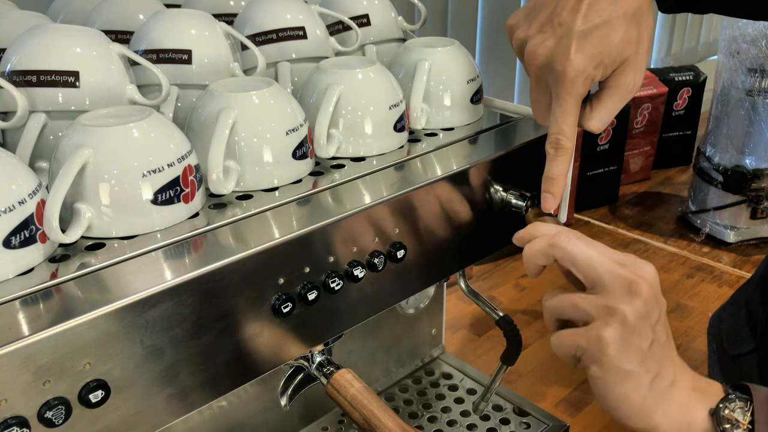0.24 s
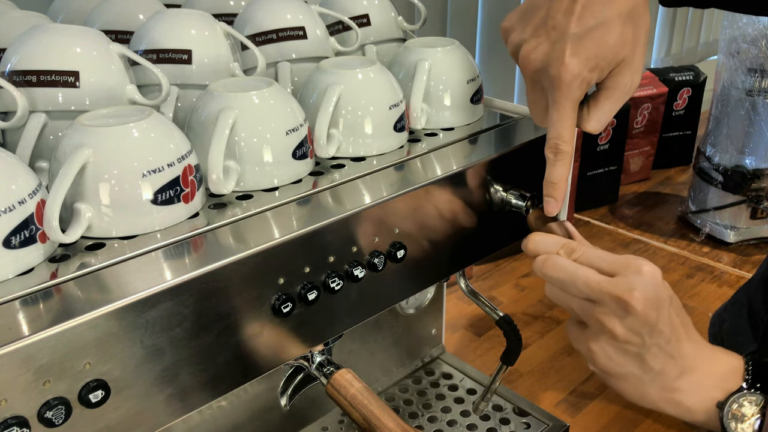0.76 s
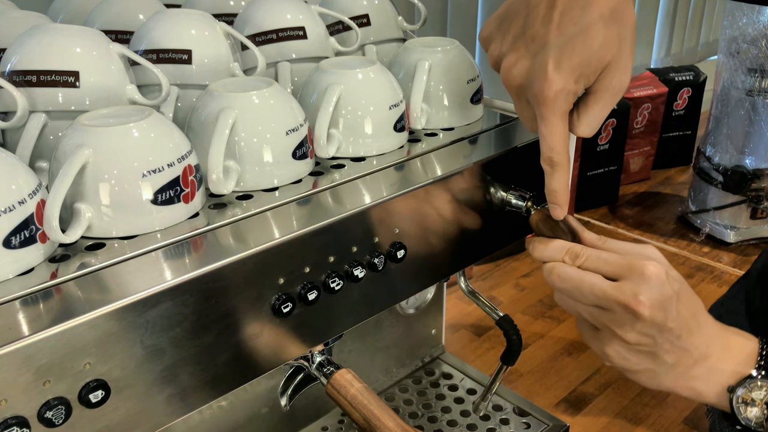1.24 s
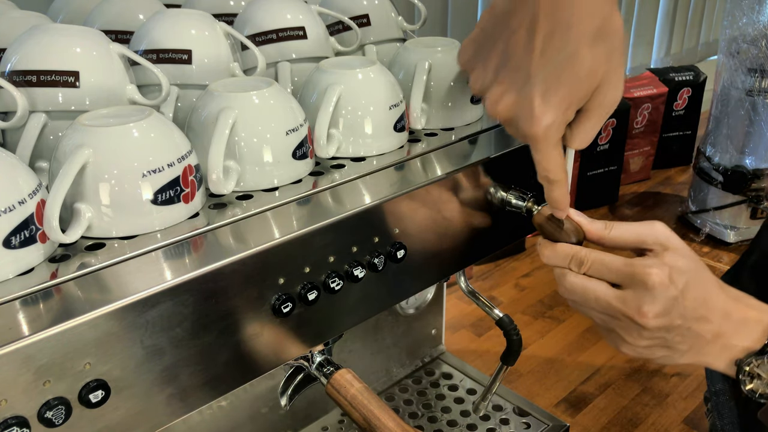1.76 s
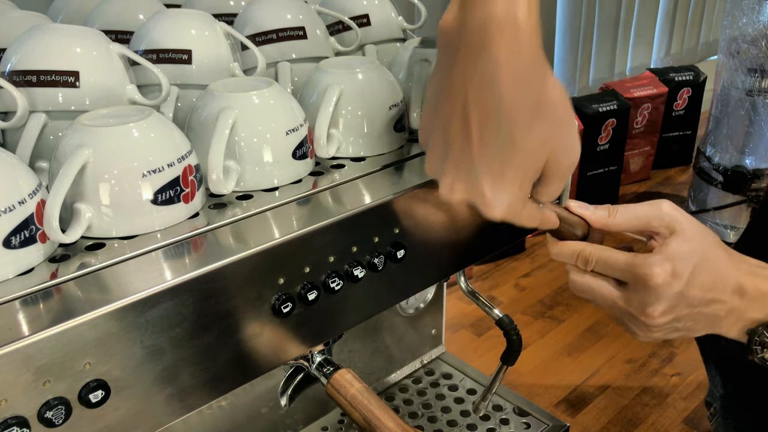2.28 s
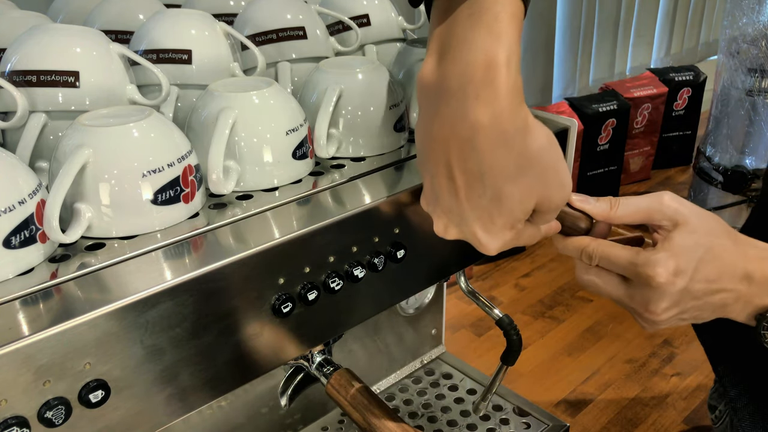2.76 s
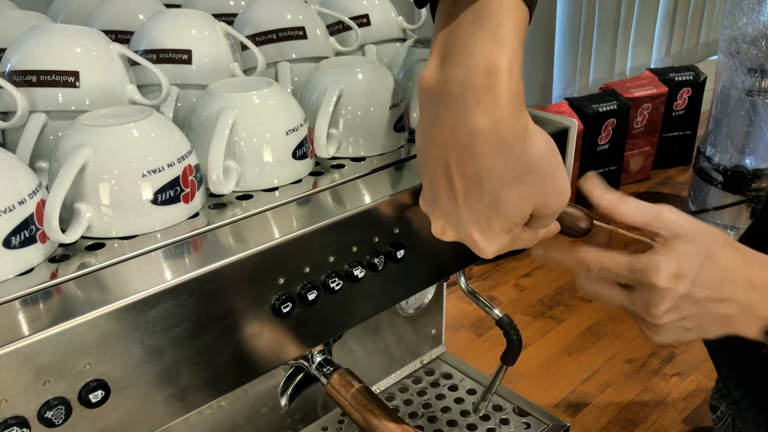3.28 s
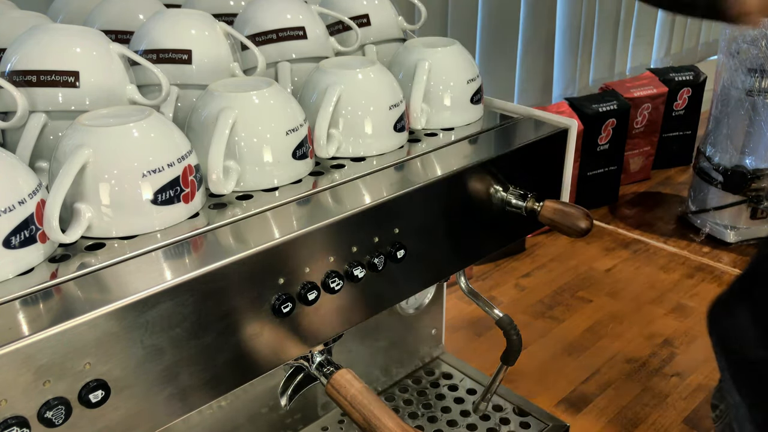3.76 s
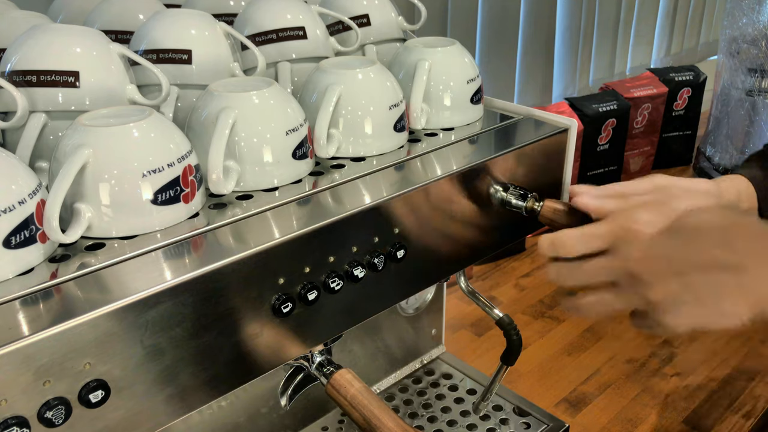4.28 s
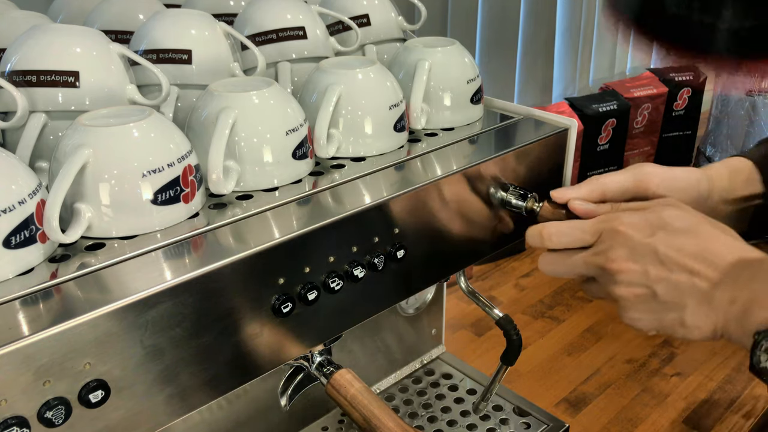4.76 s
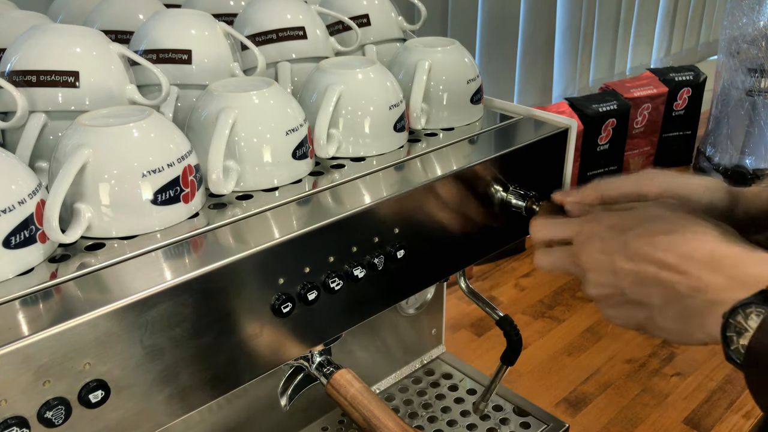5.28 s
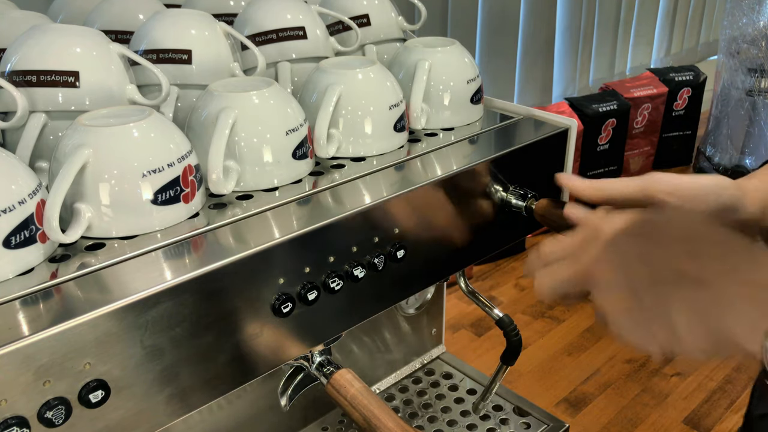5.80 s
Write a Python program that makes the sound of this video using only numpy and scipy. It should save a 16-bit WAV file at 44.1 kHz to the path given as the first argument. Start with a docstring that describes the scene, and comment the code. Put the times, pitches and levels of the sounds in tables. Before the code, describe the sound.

A loud, steady blast of steam hisses from an espresso machine wand, stutters and cuts off abruptly, leaving faint room tone and ticks.

```python
"""A steam wand blows into the air of a small room: noise in narrow bands for the hiss, low noise for the rumble.
Its colour shifts with flow, aim, nearby hands and the microphone's tilt; resonances add breathy whistles.
The lever is flicked nearly shut and part-way open again, then closed; each move sends a slow pressure swing.
Afterwards a noise-built room tail dies away, leaving room tone, a faint motor buzz and a few dry ticks."""
import sys
import numpy as np
from scipy import signal
from scipy.fft import rfft, irfft
from scipy.io import wavfile
from scipy.ndimage import uniform_filter1d

SR = 44100
rng = np.random.default_rng(int(sys.argv[2]) if len(sys.argv) > 2 else 0)


def volts_from_decibels(level):
    """Turn decibel levels (scalar or array-like) into linear amplitude factors."""
    exponent = np.asarray(level, float) / 20
    return 10 ** exponent


def transcribe(u):
    """Save the signal u as a 16-bit wav file named by the first command-line argument.

    u: samples, shape (n,) or (channels, n), limited to [-1, 1]; the rate is SR.
    q: integer samples, one column per channel.
    """
    v = np.clip(np.atleast_2d(u).T, -1, 1)
    q = np.round(v * 32767).astype(np.int16)
    wavfile.write(sys.argv[1], SR, q)


N = 266143


def rms_one(x):
    """Scaled to rms 1."""
    return x / np.sqrt(np.mean(x ** 2) + 1e-20)


def in_time(rows):
    """Each column of a table after the first as one value per sample, ramped between the rows."""
    start_s, *columns = np.transpose(rows)
    t = np.arange(N) / SR
    return [np.interp(t, start_s, column) for column in columns]


def at_hz(points, hz):
    """A spectrum read on a log-frequency axis."""
    point_hz, value = np.array(points)[:, :2].T
    return np.interp(np.log(np.maximum(hz, 1)), np.log(point_hz), value)


def drift(corner_hz):
    """Random movement of spread 1: noise at every 40th sample through a double one-pole low-pass."""
    pole = np.exp(-80 * np.pi * corner_hz / SR)
    noise = rng.standard_normal(N // 40 + 4002)
    slow = signal.lfilter([1], [1, -2 * pole, pole * pole], noise)[4000:]   # drop the filter's start-up
    slow = (slow - slow.mean()) / slow.std()
    return np.interp(np.arange(N) / 40, np.arange(len(slow)), slow)


def coloured(spectrum):
    """Noise with the shape of a given spectrum, rms 1."""
    gain = volts_from_decibels(at_hz(spectrum, np.fft.rfftfreq(N, 1 / SR)))
    return rms_one(irfft(rfft(rng.standard_normal(N)) * gain, N))


def resonance(x, hz, width_hz):
    """Two-pole resonance with gain 1 on top."""
    r = np.exp(-np.pi * width_hz / SR)
    poles = [1, -2 * r * np.cos(2 * np.pi * hz / SR), r * r]
    return signal.lfilter([(1 - r * r) / 2, 0, (r * r - 1) / 2], poles, x)


# The jet as heard: flow, aim toward the microphone, cupping by hands near the nozzle,
# tilt of the microphone, shading by an arm.
# start_s, flow_db, aim_db, cupping_db, tilt_db, shading_db
JET_MOVES = [(0.0, 0, 3.5, 0, 0.5, 0.2), (0.25, 0.8, 3, 0.7, -0.5, 0.5), (0.5, 0, 3.5, 0.2, 1.3, 0),
             (0.75, 0.1, 2.5, -0.5, 1.6, -2.5), (1.0, -0.4, 2, -0.5, 3, -2),
             (1.2, -1.7, 0.9, -0.2, 2.5, -2.5), (1.4, -2.5, 0.3, -0.9, 2, -1.5),
             (1.65, -2.5, 0, -0.7, -0.5, 1), (1.9, -2, -0.5, -0.5, 0, 1), (2.2, -2.5, -1.0, 0, -1, 2),
             (2.5, -1.6, -1.1, 0, 0.1, -0.5), (2.8, -1.7, -1, 0, -1.1, 0.5), (3.1, -1.0, -1, -0.2, 0, -1.5),
             (3.3, -2, -0.5, 0.2, -0.5, 0), (3.45, -0.3, -0.1, 1, -3, -0.5), (3.6, 0.4, 1.5, 0, -2.9, 1),
             (3.85, 0.5, 1.5, 0.9, -2.5, 0.5), (4.1, -0.1, 1.5, 1, -3.5, 3), (4.2, 0, -1.2, 0.5, 0.5, 0),
             (4.3, 0, -1, -0.2, 2, 4.5), (4.45, 3, -1, 0, -0.5, 0.7), (4.6, 3.5, 1, -1.5, -0.5, -1),
             (4.75, 4.5, 1.5, -1, -0.5, 0.5), (4.83, 4, 0.7, -1.2, 0.5, 1), (4.88, 3.5, -1, -0.3, 2, 2),
             (5.0, 2.5, -1.5, 3, -2, -1.5), (5.15, 3, -0.4, 3, 1.1, -1), (5.3, 2.5, -1, 4, 2, 3),
             (5.35, 2.5, 0.5, 1.5, 0.5, -1.5), (5.45, 4.0, 0, 3.5, 0.5, 2.5), (5.56, 2.5, 0, 3.5, 3, 2.5)]


def jet_controls():
    """The five movements that colour the jet, one row each in dB."""
    return np.array(in_time(JET_MOVES))


# The lever's moves.
# start_s, opening_0_to_1
LEVER = [(0, 1), (5.306, 1), (5.318, .08), (5.331, .08), (5.338, .72), (5.55, .72), (5.561, .22),
         (5.574, 0), (6.04, 0)]


def valve_opening():
    """The lever sets how much of the jet gets through, from 0 (shut) to 1 (open)."""
    return np.clip(in_time(LEVER)[0], 0, 1)


# A hand passing close throws an echo that cancels one pitch and its odd multiples.
# start_s, first_notch_hz, echo_share_0_to_1
HAND_ECHO_MOVES = [(0, 3000, 0), (4.6, 3000, 0.03), (4.7, 3400, .15), (4.82, 4200, 0.25),
                   (4.95, 4650, 0.27), (5.08, 5600, 0.3), (5.2, 5800, 0), (6.04, 5800, 0)]


def hand_echo_gain(hz, notch_hz, echo):
    """Rise and fall of a hiss band as the hand's echo adds to it or cancels it."""
    dulled = echo / (1 + (hz / 9000) ** 4)   # skin and sleeve return little above 9 kHz
    return np.sqrt(1 + 2 * dulled * np.cos(np.pi * hz / notch_hz) / (1 + dulled ** 2))


# Peaks and dips of the hiss among steel, cups and hands: level with all controls at 0 dB,
# then the dB gained per dB of each control.
# pitch_hz, level_db_per_hz, flow_share, aim_share, cupping_share, tilt_share, shading_share
HISS_BANDS = [(1780, -76.5, 1, -0.57, -0.4, 0.46, 0.5), (1990, -69, 0.7, -1.4, -1.49, -0.3, 0.05),
              (2060, -67, 0.92, -2, -2, -0.31, 0.16), (2380, -68, 1.2, -0.7, -0.63, -0.23, 0.17),
              (2490, -68.5, 1, -1.6, -0.051, 0.04, -0.13), (2700, -66.5, 1, -1.5, 0.68, 0.42, -0.06),
              (2790, -65, 0.04, -1.1, 1.3, 0.32, -0.038), (3000.0, -66, 1.1, -1.9, 0.82, 0.25, -0.29),
              (3190, -65.5, 1.2, -1.7, 0.51, 0.36, 0.24), (3430, -67, 1.86, -1.46, 0.51, 0.27, 0.39),
              (3600, -69.5, 1, 0.41, 0.084, -0.57, 0.73), (3840, -65, 0.33, -0.76, 0.92, -0.66, -0.032),
              (4030, -68, 0.6, -1.7, 1.1, -0.11, -0.33), (4200, -68, 0.9, 1.5, 1.53, -0.46, -0.57),
              (4480, -66.5, 0.94, -0.18, 1, -0.24, -0.4), (4670, -68, 0.7, 0.29, 0.6, 0.11, -1),
              (4840, -68, 0.45, -0.95, 0.034, -0.97, -0.28), (5100, -72.5, 1.5, -0.84, 0.69, -0.02, -0.25),
              (5190, -68.5, 1, -0.18, -0.55, 0.23, 0.34), (5400, -67, 1.03, 0.09, -0.67, 0.38, 0.64),
              (5800, -70, 0.2, -0.31, -0.64, 0.9, 0.11), (5970, -66.5, 2.2, 0.38, 0.27, 0.91, 0.26),
              (6170, -65.5, 1.17, 0.49, 0.44, 0.32, 0.5), (6330, -68, 1.5, -0.61, -0.07, -0.028, 0.23),
              (6620, -67, 1.2, 0.54, 0.81, -0.61, 0.73), (6950, -66.5, 0.9, 0.25, 0.88, -0.52, 0.54),
              (7070, -66.5, -0.2, 0.25, 0.6, -0.51, 0.42), (7320, -68.5, 0.64, 0.21, 0.79, 0.53, 1),
              (7900, -69.5, 0.8, 0.19, 0.18, 0.19, 0.36), (8370, -66, 1, 0.59, 0.69, -0.11, -0.024),
              (9000, -67, 1.2, 0.85, -0.42, 0.4, -0.25), (9180, -65.5, 1.77, 0.28, -0.6, 0.27, 0.16),
              (9700, -64.5, 1.44, 0.08, -0.5, -0.77, 0.17), (10270, -65, 1.4, -0.15, -0.45, -0.62, -0.13),
              (10870, -64.0, 1, 0.73, -0.77, -0.46, -0.09), (11640, -65, 1.04, 1.1, -0.49, -0.13, -0.23),
              (12400, -65.5, 1.1, 1.24, -0.18, -0.06, 0.09), (12600, -70, 2, 0.85, -0.54, 0.19, -0.12),
              (13000, -67, 1, 1, -0.3, -0.2, 0), (13350, -63.5, 0.4, 1.2, -0.12, -0.59, 0.069),
              (13900, -66, 0.2, 1.52, -0.6, 0.18, -0.05), (14500.0, -66.5, 1, 1.3, -0.46, 0.07, 0.25),
              (14850, -68.5, 0.6, 0.9, -0.5, -0.1, 0), (15200, -72, -0.5, 0.52, -0.51, -0.38, -0.18),
              (15450, -70.5, 1.5, 0.67, -0.24, -0.32, 0.5), (15650.0, -71.3, 0.5, 0.39, -0.48, -0.53, 0.02)]


def hiss(controls_db, patchy_db, flutter_db, grain_db):
    """Turbulent jet in narrow bands that answer the controls; the top is grainy with droplets.
    Two rows: coloured as at the microphone, and averaged over seven bands as the walls receive it."""
    freqs = np.fft.rfftfreq(N, 1 / SR)
    smooth = rfft(rng.standard_normal(N))
    grainy = rfft(rms_one(rng.standard_normal(N) * volts_from_decibels(grain_db * drift(500))))
    notch_hz, echo = in_time(HAND_ECHO_MOVES)
    echo = np.clip(echo, 0, .9)
    flutter = flutter_db * drift(9)   # shared by all bands
    band_hz = sorted(row[0] for row in HISS_BANDS)
    corners_hz = [1385, *band_hz, 16400]
    at_mic = np.array(HISS_BANDS)[:, 1:]
    at_walls = uniform_filter1d(at_mic, size=7, axis=0, mode="nearest")
    out = 0
    for k, (hz, rows) in enumerate(zip(band_hz, np.stack([at_mic, at_walls], axis=1))):
        window = np.sin(np.pi / 2 * np.interp(freqs, corners_hz[k:k + 3], [0, 1, 0])) ** 2
        band = irfft((grainy if hz > 7000 else smooth) * window, N)
        echo_gain = np.stack([hand_echo_gain(hz, notch_hz, echo), np.ones(N)])   # only at the microphone
        level_db = rows[:, :1] + rows[:, 1:] @ controls_db
        level_db = level_db + patchy_db * drift(0.91) + flutter
        out = out + band * echo_gain * volts_from_decibels(level_db)
    return out * np.sqrt(SR / 2)   # noise of rms 1 becomes 0 dB per Hz


# Shape of the rumble; only the relative levels count.
# pitch_hz, relative_level_db_per_hz
RUMBLE_SHAPE = [(12, -0.5), (20, 3.5), (107, 3), (630, -19), (841, -18.5), (1010, -14.5), (1120, -20),
                (1300, -22), (1500, -15), (1950, -44), (3300, -120)]


def rumble(controls_db):
    """Low turbulence of the jet: coloured noise that follows flow and aim and wavers in level."""
    flow_db, aim_db = controls_db[:2]
    level_db = -39.5 + 0.59 * flow_db + 0.33 * aim_db
    return volts_from_decibels(level_db + 0.91 * drift(4.6)) * coloured(RUMBLE_SHAPE)


# Narrow resonances of wand and drip tray blown by the jet: rms level with the controls at 0 dB,
# then the dB gained per dB of each control.
# pitch_hz, width_hz, level_db, flow_share, aim_share, cupping_share
WHISTLE_TONES = [(1015, 43, -62, 0.71, -1.2, -0.48), (1466, 53, -64, 0.77, -1, -1.1),
                 (1668, 94, -56, 0.75, -0.094, -0.63), (5500, 70, -45.5, .5, -0.33, -1.5)]


def whistles(controls_db, waver_db):
    """Noise twice through each resonance: faint breathy tones that follow the jet and waver."""
    white = rng.standard_normal(N)
    out = np.zeros(N)
    for hz, width_hz, level_db, *shares in WHISTLE_TONES:
        tone = rms_one(resonance(resonance(white, hz, width_hz), hz, width_hz))
        moved_db = level_db + np.dot(shares, controls_db[:3])
        out = out + tone * volts_from_decibels(moved_db + waver_db * drift(0.35))
    return out


# The diffuse tail: time to fall by 60 dB, and level before the room's overall gain.
# pitch_hz, decay_s, relative_level_db
TAIL_BANDS = [(200, 0.69, 2), (500, 0.64, 4), (1390, 0.5, 3.5), (3000, 0.67, -8.5), (5000, 0.54, -2),
              (8000, 0.45, -1), (12000, 0.3, 4), (15000, 0.24, 4)]


def room_responses(count):
    """Diffuse tails from half-octave noise bands, each dying at its own pace, for several places."""
    t = np.arange(round(.6 * SR)) / SR
    level_points = np.array(TAIL_BANDS)[:, ::2]
    tails = np.zeros((count, len(t)))
    for hz in 100 * 2. ** np.arange(0, 7.6, .5):
        edges_hz = [hz / 2 ** .25, min(hz * 2 ** .25, .45 * SR)]
        band = signal.butter(2, edges_hz, "band", fs=SR, output="sos")
        noise = signal.sosfilt(band, rng.standard_normal(tails.shape))
        decay_s = at_hz(TAIL_BANDS, hz)
        tails += noise * volts_from_decibels(at_hz(level_points, hz) - 60 * t / decay_s)
    tails *= np.clip(t / 0.0088, 0, 1)   # builds up over 8.8 ms
    return volts_from_decibels(-40) * tails


def room(x, count):
    """The jet through the room tail; the hand-held microphone drifts through several places."""
    responses = room_responses(count)
    length = responses.shape[1]
    run_in = np.concatenate([x[length:0:-1], x])   # the jet was already blowing
    out, hop = np.zeros(N), N // (count - 1) + 1
    for k, response in enumerate(responses):
        start, stop = max((k - 1) * hop, 0), min((k + 1) * hop, N)
        fade = np.cos(np.pi / 2 * (np.arange(start, stop) / hop - k)) ** 2
        wet = signal.fftconvolve(run_in[start:stop + length], response, "valid")[1:]
        out[start:stop] += fade * wet
    return out


# Shape of the room tone; only the relative levels count.
# pitch_hz, relative_level_db_per_hz
ROOM_TONE_SHAPE = [(29, -29), (55, -21), (270, -25), (673, -37), (1300, -44), (2240, -47), (2900, -49),
                   (6540, -56), (10000, -55.5), (15500, -59)]


def room_tone():
    """Steady coloured noise under everything, -54 dB rms."""
    return volts_from_decibels(-54) * coloured(ROOM_TONE_SHAPE)


# Motor buzz partials: rms level about which each one wavers.
# pitch_hz, level_db
BUZZ_PARTIALS = [(2336, -75), (2439, -73), (2541, -75), (3155, -82), (3564, -84)]


def motor_buzz():
    """A small motor: sine partials, each wavering in level and phase."""
    t = np.arange(N) / SR
    out = np.zeros(N)
    for hz, level_db in BUZZ_PARTIALS:
        level = np.sqrt(2) * volts_from_decibels(level_db + 3.3 * drift(22))
        out += level * np.sin(2 * np.pi * hz * t + .35 * drift(15))
    return out


# Low cuts at the vent and input stage of the microphone.
# corner_hz, resonance_q
MIC_LOW_CUTS = [(3.7, 1.5), (10.5, 1.0)]


def pressure_swing(opening):
    """Shutting off the flow steps the air pressure; the microphone lets only a slow swing through."""
    step = 1 - opening
    for hz, q in MIC_LOW_CUTS:
        w = 2 * np.pi * hz
        high_pass = signal.bilinear([1, 0, 0], [1, w / q, w * w], SR)
        step = signal.lfilter(*high_pass, step)
    softened = signal.sosfilt(signal.butter(2, 70, fs=SR, output="sos"), step)
    return volts_from_decibels(-17.8) * softened


# Small ticks and a soft pop: peak of the bright ring, its pitch, and gain of the low thud.
# start_s, peak_db, ring_hz, thud_db
TICK_EVENTS = [(5.8615, -39, 12000, -62), (5.8655, -50, 11000, -70), (5.8697, -29, 10900, -56),
               (5.8787, -55, 10500, -75), (5.9296, -40, 4200, -36)]


def ticks():
    """Close and dry: a short bright ring over a damped thud whose pitch sags back to 125 Hz."""
    out = np.zeros(N)
    t = np.arange(round(.03 * SR)) / SR
    for start_s, peak_db, ring_hz, thud_db in TICK_EVENTS:
        burst = .4 * rng.standard_normal(len(t)) - 1.5 * (t == 0)
        burst = burst * np.exp(-t / .0003)
        width_hz = .55 * ring_hz
        ring = resonance(resonance(burst, ring_hz, width_hz), ring_hz, width_hz)
        snap = ring + .5 * resonance(burst, 2700, 2200)
        bend = 2.8 * (1 - np.exp(-(t / .0015) ** 2))   # radians
        thud = np.sin(2 * np.pi * 125 * t + bend) * np.exp(-(t / .006) ** 2)
        at = round(start_s * SR)
        out[at:at + len(t)] += volts_from_decibels(peak_db) * snap / abs(snap).max() + volts_from_decibels(thud_db) * thud
    return out


def scene():
    """Flow, aim, hands and microphone colour the jet, the valve gates it; one microphone hears it all."""
    controls_db = jet_controls()
    opening = valve_opening()
    jet = hiss(controls_db, patchy_db=0.87, flutter_db=0.59, grain_db=1.1)
    jet = jet + rumble(controls_db)
    near, far = opening * jet
    near = near + opening * whistles(controls_db, waver_db=1)
    heard = near + room(far, count=12) + room_tone() + motor_buzz()
    heard = heard + pressure_swing(opening) + ticks()
    return np.array([heard, heard])


def band_limit(x):
    """A steep low-pass at the top of the band."""
    return signal.sosfilt(signal.butter(12, 16380, fs=SR, output="sos"), x)


def record(dry):
    """The top is cut steeply at 15720 Hz."""
    steep_cut = signal.ellip(14, .5, 65, 15720, fs=SR, output="sos")
    mix = signal.sosfilt(steep_cut, dry)
    return band_limit(mix)


dry = scene()
out = record(dry)
transcribe(out)
```